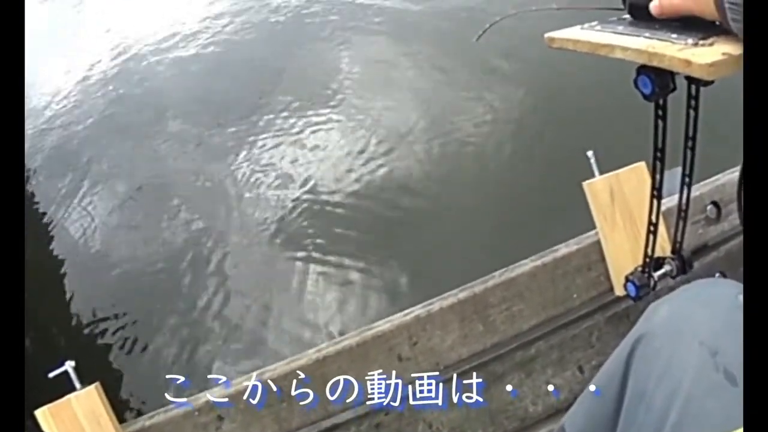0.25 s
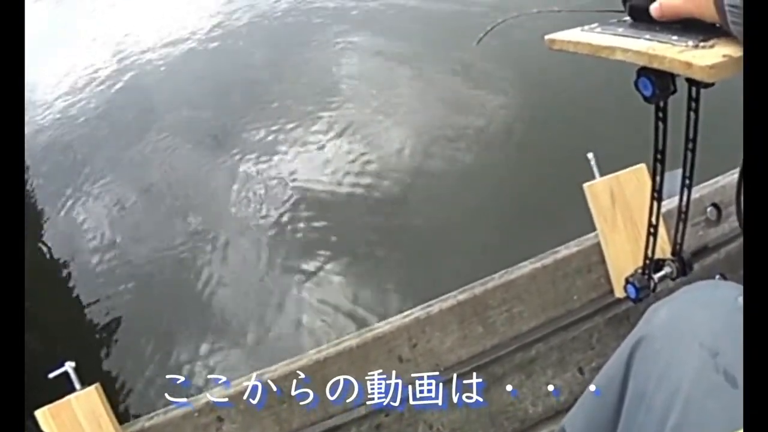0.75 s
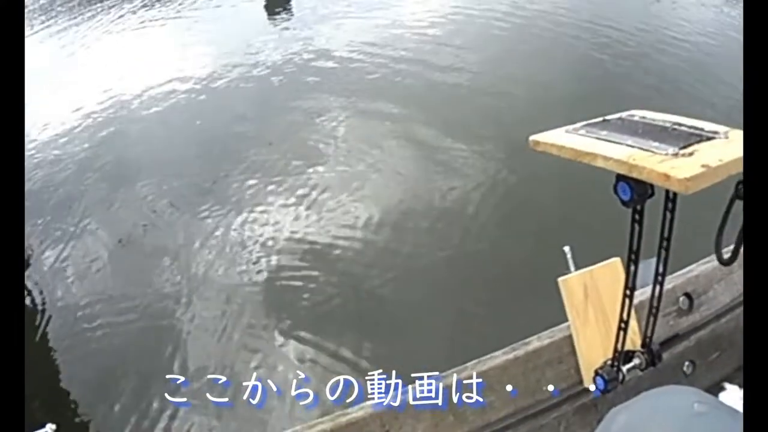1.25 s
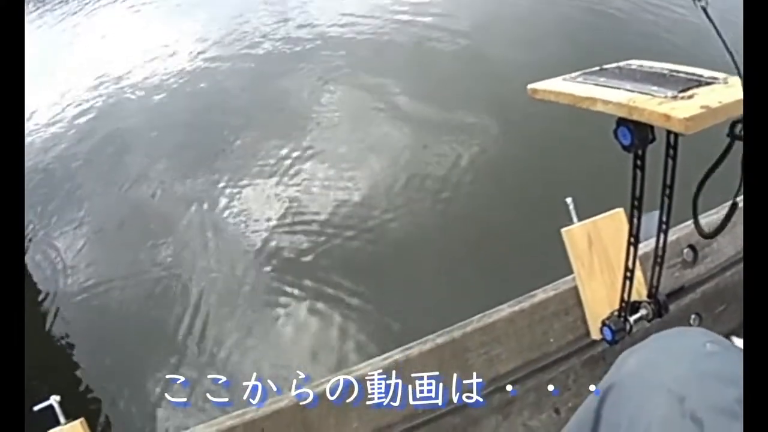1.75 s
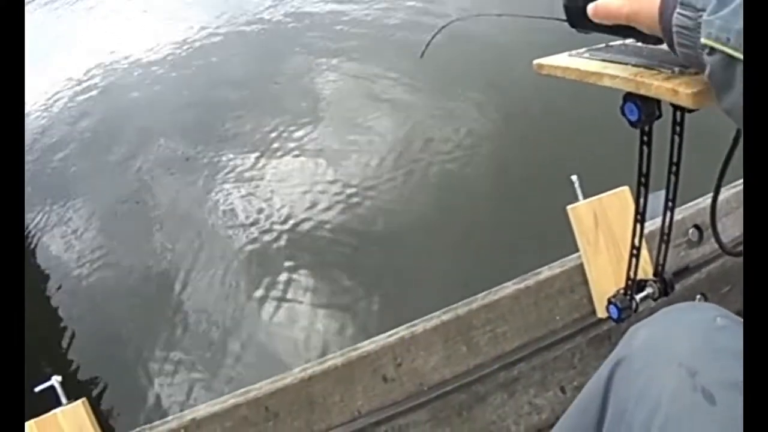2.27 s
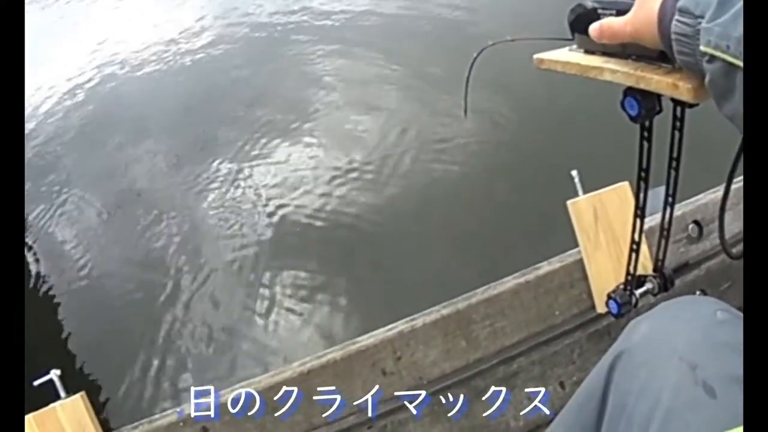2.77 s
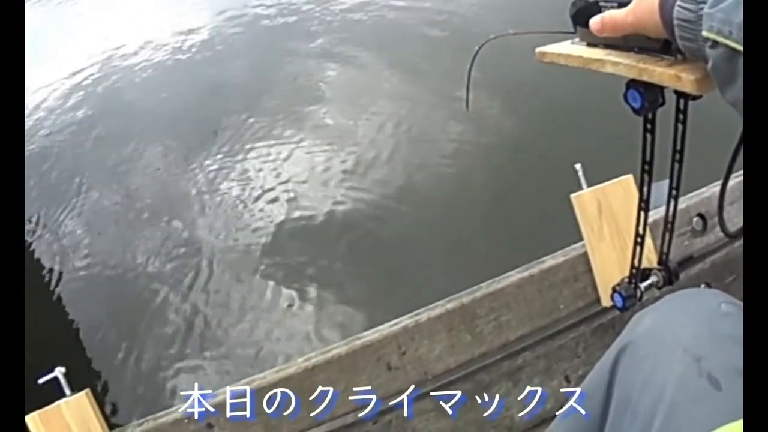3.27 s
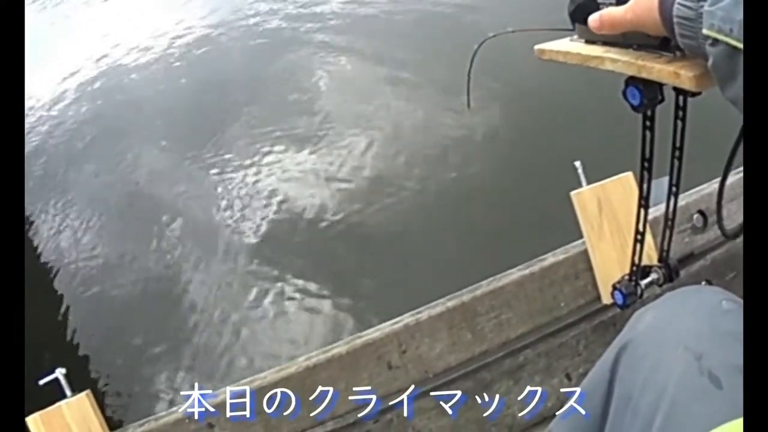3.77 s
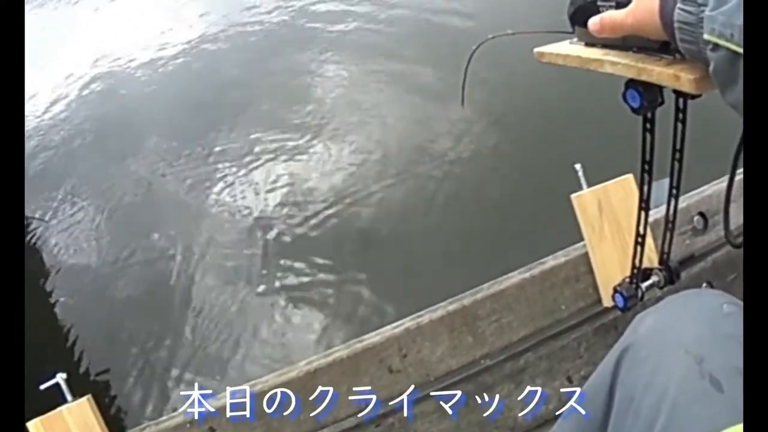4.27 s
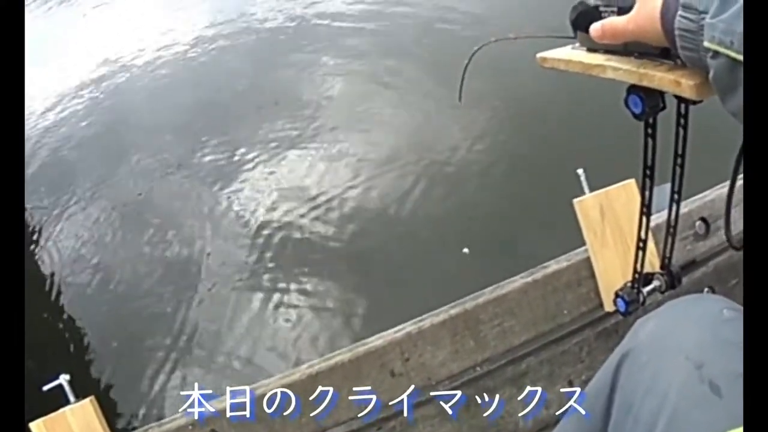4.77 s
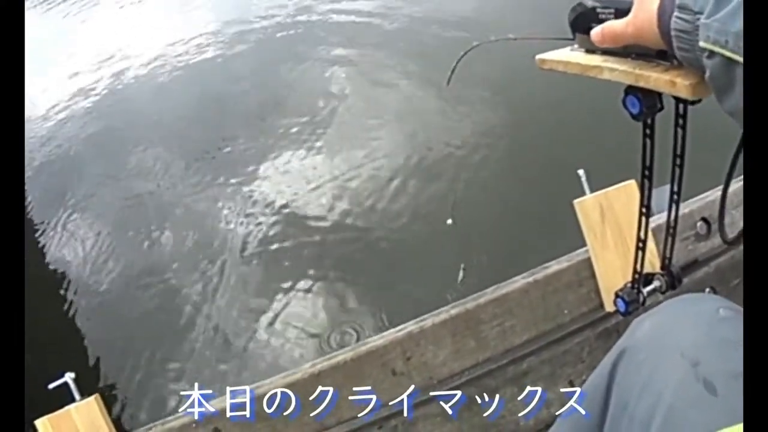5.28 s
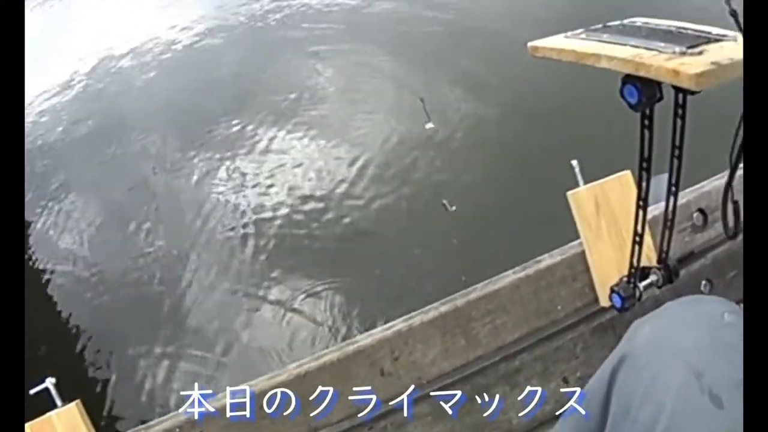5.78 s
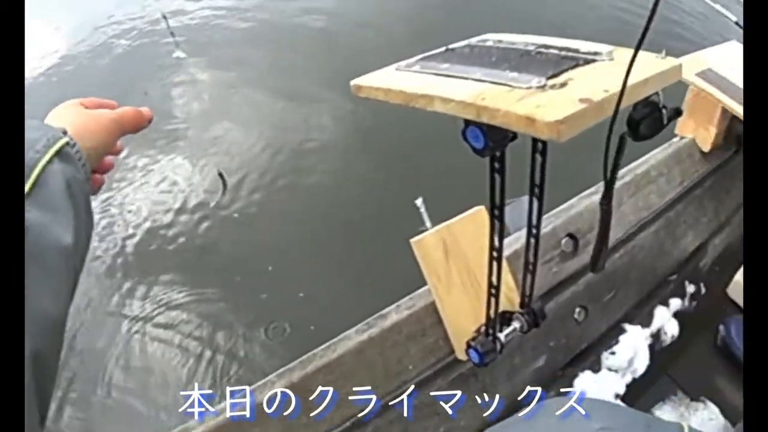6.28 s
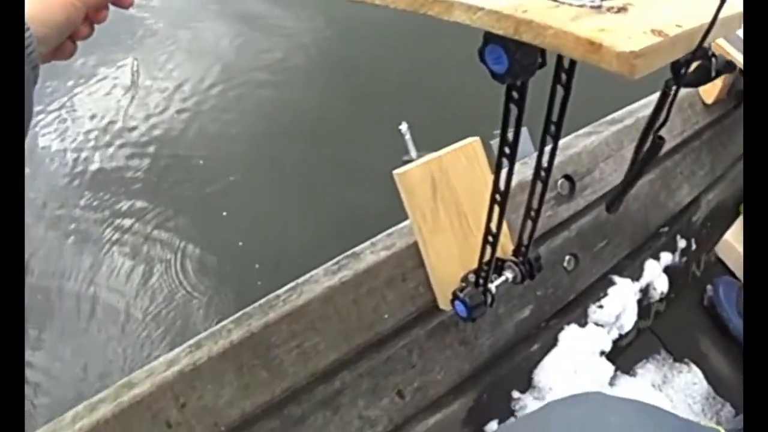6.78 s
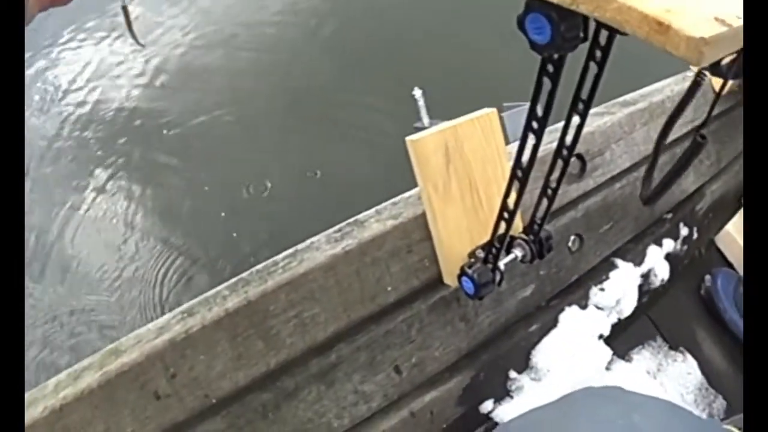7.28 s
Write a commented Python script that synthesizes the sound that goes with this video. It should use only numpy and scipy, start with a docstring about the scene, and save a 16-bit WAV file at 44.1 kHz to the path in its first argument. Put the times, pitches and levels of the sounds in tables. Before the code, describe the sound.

Quick bouts of light ticking from a small reel, then its motor whines and hisses before clothing rustles and hard knocks thump close by.

```python
"""Palm-sized electric fishing reel: jigged, it ticks; its motor then whines and hisses, winding in line.
Ticks and clicks are struck resonances; gear noise rings the reel's modes and shaft harmonics whine.
A scuff, line rasps and a drag are grainy noise. A nylon sleeve rustles and knocks on a worn camera's case
(noise swells, struck modes). Behind: noise for still air and ripples at a small boat; wavering sines
for bubble plips, low hull slaps and the hollow note of a knock."""
import sys
import numpy as np
from scipy import signal
from scipy.fft import rfft, irfft
from scipy.io import wavfile
from scipy.ndimage import uniform_filter1d

SR = 44100
rng = np.random.default_rng(int(sys.argv[2]) if len(sys.argv) > 2 else 0)


def generate_wav(signal):
    """Clip the signal to [-1, 1] and save it as 16-bit WAV at the path in sys.argv[1]."""
    frames = np.transpose(np.atleast_2d(signal))
    scaled = np.clip(frames, -1, 1) * 32767
    pcm = np.round(scaled).astype(np.int16)
    wavfile.write(sys.argv[1], SR, pcm)


N = 332514
TIME_S, BIN_HZ = np.arange(N) / SR, np.fft.rfftfreq(N, 1 / SR)
STRIKE_SAMPLES = 4096
STRIKE_HZ = np.fft.rfftfreq(STRIKE_SAMPLES, 1 / SR)
EDGE_HZ = 11150

# left-right likeness: (frequency [Hz], likeness [0-1])
CASE_LIKENESS = [(30, 0.98), (150, 1), (500, 0.88), (1300, .95), (2100, .93), (2900, 0.73), (3900, 0.77),
                 (6000, 0.8), (10000, 0.5)]  # carried by the case
AIR_LIKENESS = [(30, 0.92), (90, 1), (220, 0.62), (550, 0.027), (1300, 0.46), (2000, 0.58), (2900, 0.15),
                (3900, 0.69), (6000, 0.89), (10000, 0.57)]  # from the open air

# still air: (frequency [Hz], level [dB])
AIR_COLOUR = [(13, -45), (22, 0), (53, -13.5), (119, -7.5), (206, -9), (289, -10.5), (320, -8.5),
              (355, -12), (438, -8.5), (817, -13.5), (1010, -12.5), (1370, -11), (1690, -14), (4310, -16.5),
              (11000, -36), (14300, -81), (22000, -120)]
AIR_DB = -60.5
# ripples along the hull, before drift and a 2.5 dB cut: (time [s], level [dB])
RIPPLE_LEVELS = [(0, -74), (.3, -72), (.7, -80), (1.3, -64.5), (1.8, -55.5), (2.4, -59), (4.8, -59),
                 (5.15, -62.5), (7.54, -64)]
# bubble plips, low hull slaps and the hollow note of a knock:
# (start [s], peak [dB], starting pitch [Hz], a quarter of the duration [s])
SHORT_NOTES = [(0.002, -53.5, 1310, 0.044), (0.123, -48, 1274, 0.018), (0.557, -58, 1880, .025),
               (1.007, -43, 128, 0.013), (1.196, -36, 760, 0.017), (1.380, -48.5, 164, 0.029),
               (1.484, -46, 196, 0.023), (1.9, -44, 205, 0.011), (2.765, -45, 1318, 0.026),
               (3.47, -49, 1560, 0.022), (3.689, -55.5, 413, 0.016), (4.015, -50, 1288, 0.046),
               (4.523, -53, 1330, 0.026), (4.929, -57.5, 788, 0.052), (6.880, -39, 135, 0.028)]

# modes of the camera case: (frequency [Hz], width [Hz], level [dB])
CASE_MODES = [(183, 130, -10.5), (814, 98, -1.5), (1335, 164, 1.5), (1827, 214, -2.5), (2340, 200, -10),
              (3570, 390, -16.5)]
# hollow case mode that heavy knocks wake: (frequency [Hz], width [Hz])
THUD_MODE = (356, 35)
# knocks on the case: (start [s], level [dB], brightness [dB/octave], thud mode [dB])
CASE_KNOCKS = [(0.6414, -30.5, 20, -30), (1.004, -27, -10.5, -7), (1.011, -27, 11, -14),
               (1.073, -31.5, -10, -5), (1.2004, -29.5, -5, -21), (5.379, -45, -1, -37),
               (5.9412, -22, -2, -25), (5.9519, -5.5, 5, -8), (6.0157, -9.5, 5, -4.5),
               (6.279, -20, 10, -25), (6.9980, -6.5, 2.5, -31), (7.1363, -30, -11.5, -29.5),
               (7.1579, -15.5, -4.5, -2.5), (7.304, -29.5, 18, -27)]
# cloth spectra: (frequency [Hz], level [dB])
RUB_SPECTRUM = [(40, -44), (130, -11), (250, -15.5), (380, -10.5), (560, -18.5), (780, -4.5), (1000, -7.5),
                (1320, 0.5), (1600, -17), (1900, -6.5), (2450, -15.5), (3100, -18.5), (4000, -20),
                (6000, -42)]
SWISH_SPECTRUM = [(880, -49), (1500, 0.5), (1980, -8), (2160, -16.5), (2450, -3.5), (3370, -4), (4150, -11),
                  (4660, -5.5), (8220, -22), (11000, -45.5), (14300, -78), (22000, -120)]
FOLD_SPECTRUM = [(22, -5), (60, -13.5), (120, 0), (200, -5.5), (330, -11.5), (600, -12.5), (1200, -12.5),
                 (2400, -48)]
SCRAPE_SPECTRUM = [(700, -15), (1200, -13), (1550, 4.5), (2000, 1.5), (2170, 3), (2480, 0), (2850, -2.5),
                   (3300, -18), (3700, -5.5), (4700, -13), (6000, -57)]
# arm movements:
# (peak [s], rise [s], fall [s], rubbing [dB], nylon swish [dB], heavy folds [dB], hard scraping [dB])
MOVES = [(0.12, 0.29, 0.37, -69.5, -62.5, -71.5, -79), (1.04, 0.23, .29, -46.5, -55.5, -49, -59),
         (1.54, 0.29, 0.38, -57, -61.5, -57.5, -60), (5.72, 0.23, 0.75, -55.5, -61.5, -62, -75),
         (6.149, 0.24, 0.16, -40, -38.5, -47.5, -39), (6.249, 0.2, 0.26, -37, -44, -47, -35),
         (6.65, 0.65, 0.66, -42, -48.5, -52.5, -58), (6.889, 0.12, 0.11, -41.5, -68, -46, -70),
         (7.255, .17, 0.16, -42, -53.5, -55, -47), (7.52, 0.2, .2, -48.5, -58, -54.5, -57.5)]
SCRAPE_SHARE = 0.7  # of a movement's rise and fall
# drop one rise before and one fall after the peak; shape 1 = pointed, 2 = round
SWELL_DROP_DB, SWELL_SHAPE = 20.5, 1.85

# rasp and drag spectra: (frequency [Hz], level [dB])
RASP_SPECTRUM = [(530, -62), (900, -31), (1310, -12.5), (1820, -10), (2080, -23), (2570, -7), (3030, -12),
                 (3820, -4), (8120, -22.5), (11000, -38), (14300, -67), (22000, -120)]
DRAG_SPECTRUM = [(2000, -43), (2550, -10), (2880, 0), (3500, -8.5), (4000, 0), (4700, -9.5), (5700, -16),
                 (6700, -15), (7150, -10.5), (8200, -29), (11000, -45)]
# short rasps, an early scuff, then line jerking over the spool: (peak [s], rise [s], fall [s], level [dB])
SHORT_RASPS = [(0.126, 0.01, 0.016, -48.5), (3.153, 0.0068, .014, -54), (3.196, 0.061, .032, -41.5)]
DRAG_FROM_S, DRAG_TO_S, DRAG_RAMP_S, DRAG_DB = 4.16, 4.6, 0.098, -51

# motor speed, giving with the pull on the line: (time [s], shaft speed [turns/s])
SHAFT_SPEED = [(1.9, 102), (2.3, 106.5), (2.58, 107.7), (2.72, 111.7), (2.87, 111.9), (3.08, 113.5),
               (3.21, 111.2), (3.3, 111.7), (3.41, 108.8), (3.58, 108.4), (3.67, 111), (3.77, 111.1),
               (3.93, 104.9), (4.5, 106), (4.9, 105)]
# whine harmonics: (multiple of shaft speed, level [dB])
WHINE_HARMONICS = [(26, -12), (27, -1), (51, -10), (54, -11), (63, -12)]
# reel modes rung by the gears: (frequency [Hz], width [Hz], level [dB])
GEAR_MODES = [(2920, 180, 1), (3463, 113, 3), (3830, 51, -4), (4700, 200, -6), (5040, 260, -5),
              (5900, 300, -5), (6660, 310, -5.5), (7200, 540, -9.5)]
# narrow spool modes, sung as shaft harmonics pass: (frequency [Hz], width [Hz], level [dB])
SPOOL_MODES = [(3505, 45, -73), (3660, 14, -67.5), (3920, 46, -66)]
POLES = 3
MOTOR_ON_S, MOTOR_OFF_S, FADE_IN_S, FADE_OUT_S = 1.83, 4.91, 0.27, 0.071
WHINE_DB, LOADED_GAIN_DB = -78, 15  # gain added while the rod is bent hardest
LOAD_FROM_S, LOAD_TO_S, LOAD_RAMP_S = 2.56, 3.96, 0.09
HISS_PEAK_DB, HISS_PEAK_S, HISS_EASE_DB_PER_S2 = -57, 3.18, -2
TAUT_FROM_S = 2.22  # line taut: the spool can sing

# clicks of the reel's plastic shell, before a common 2 dB gain:
# (start [s], level [dB], brightness [dB/octave], place [0 = switch, 1 = frame], left-right [dB])
SHELL_CLICKS = [(2.4990, -14.5, 2.5, 0, -0.5), (4.0990, -36.5, -13, 1, -1), (4.1504, -17, 0, 1, 2),
                (4.845, -44.5, -6, 0.24, 0), (5.273, -34.5, -10.5, 0.24, 0)]
# shell modes: (frequency [Hz], width [Hz], struck at switch [dB], struck at frame [dB])
SHELL_MODES = [(230, 210, -17.5, -55), (1317, 68, -1.5, -22), (1630, 56, -16, -9), (1790, 140, -6, -32),
               (2953, 76, -2, 1.5), (3650, 180, 3.5, -24), (3790, 110, -23, 5), (3970, 240, -22, -3),
               (4330, 340, -8, -10), (4460, 140, -3, -8), (5070, 170, -3, -0.5), (5270, 280, -11.5, -28),
               (5600, 100, -18, -6), (6870, 140, -18.5, -21), (7500, 210, -15, -16.5)]
# single ticks outside the bouts, the first a lone jig stroke, sounded 0.8 ms late: (time [s], level [dB],
# brightness [dB/octave])
SINGLE_TICKS = [(0.0227, -34.5, 4), (1.5822, -32, -5), (1.8945, -38.5, 3), (1.948, -38.5, -11)]
# (frequency [Hz], width [Hz], level [dB])
REEL_TICK_MODES = [(3040, 230, -7.5), (3650, 270, -8), (3980, 420, -3.5), (4760, 170, -9.5),
                   (6140, 200, -10.5), (7750, 350, -45)]
# jigging bouts: (first tick [s], last stroke tick [s], level [dB], first-stroke offset [dB])
JIG_BOUTS = [(0.0984, 0.2515, -40.5, 2), (0.327, 0.6274, -27.5, -3), (0.7847, 1.238, -28.5, -8),
             (1.3226, 1.4716, -27, -4.5)]
STROKE_S, TIRING_DB_PER_S2 = 0.075, -66
RETURN_S, RETURN_DB = 0.04, -12  # softer tick as the reel swings back
STROKE_DB_PER_OCT, RETURN_DB_PER_OCT, SPREAD_DB_PER_OCT = 0.4, -8, 0.81


def amp(db):
    """Decibels to gain."""
    return 10 ** (np.asarray(db) / 20)


def unit(x):
    """Scaled to rms 1."""
    return x / np.sqrt(np.mean(x ** 2) + 1e-20)


def read(points, hz=BIN_HZ):
    """A table interpolated along log frequency."""
    f, value = np.transpose(points)
    return np.interp(np.log(hz + 1), np.log(f + 1), value)


def level(s, db):
    """Gain along a dB curve, -140 dB outside it."""
    return amp(np.interp(TIME_S, s, db, left=-140, right=-140))


def add(mix, s, sound):
    """Mixes a stereo sound in at time s."""
    part = mix[:, max(round(s * SR), 0):][:, :sound.shape[1]]
    part += sound[:, :part.shape[1]]


def resonances(modes, hz):
    """Gain of a body: mode powers added."""
    power = 0
    for f, width, db in modes:
        detune = (hz ** 2 - f ** 2) / (width * hz + 1)
        power = power + amp(db) ** 2 / (1 + detune ** 2)
    return np.sqrt(power)


def below(hz, edge_hz, order):
    """Low-pass gain; a negative order makes it a high-pass."""
    return 1 / np.sqrt(1 + ((hz + 1) / edge_hz) ** (2 * order))


def wander(rate_hz):
    """Low-passed random drift of rms 1."""
    noise = rfft(rng.standard_normal(N))
    return unit(irfft(noise * below(BIN_HZ, rate_hz, order=3), N))


def coloured(pair, gain, likeness):
    """Mid and side drives become one coloured stereo sound of rms 1."""
    a, b = rfft(pair)
    same = np.clip(read(likeness), 0, 1)
    mid, side = a * np.sqrt(1 + same), b * np.sqrt(1 - same)
    return unit(irfft(np.array([mid + side, mid - side]) * gain, N))


def friction(gain, likeness, grains_per_s, spread_db, grainy):
    """Tiny slips of uneven size over a smooth hiss."""
    sizes = amp(spread_db * np.minimum(rng.exponential(1, N), 3))
    slips = (rng.random(N) < grains_per_s / SR) * sizes
    grains = unit(slips * rng.choice([-1, 1], (2, N)))
    return coloured(rng.standard_normal((2, N)) + grainy * grains, gain, likeness)


def strike(gain, ring_peak_db, echo_s, echo, scatter, scatter_s, width):
    """A blow rings a body; one near reflection and a short scatter follow."""
    # minimum phase: the ring starts at once
    log_gain = np.log(np.maximum(gain / gain.max(), 1e-5))
    mirrored = np.r_[log_gain, log_gain[-2:0:-1]]
    ring = np.fft.ifft(np.exp(np.conj(signal.hilbert(mirrored)))).real
    t = np.arange(STRIKE_SAMPLES) / SR
    decay = np.exp(-t / scatter_s) + 0.018 * np.exp(-t / 0.015)
    mid, side = rng.standard_normal((2, STRIKE_SAMPLES)) * decay
    paths = (scatter * mid + width * np.array([side, -side])) / np.linalg.norm(mid)
    paths[:, 0] += 1  # direct sound
    reflection = echo * np.exp(-2j * np.pi * STRIKE_HZ * echo_s)
    sound = irfft(rfft(ring) * (rfft(paths) + reflection), STRIKE_SAMPLES)
    return amp(ring_peak_db) * sound / abs(ring).max()


def tilt(db_per_octave, centre_hz):
    """Brightness slope about a centre, flat beyond two octaves."""
    return amp(db_per_octave * np.log2(np.clip(STRIKE_HZ / centre_hz, 1 / 4, 4)))


def swell(peak_s, rise_s, fall_s, db):
    """Gain of a movement that gathers speed and slows again."""
    away = np.maximum((peak_s - TIME_S) / rise_s, (TIME_S - peak_s) / fall_s)
    return amp(db - SWELL_DROP_DB * np.minimum(away, 10) ** SWELL_SHAPE)


def held(from_s, to_s, attack_s, release_s):
    """Attack, hold and release, 0-1."""
    return np.clip(np.minimum((TIME_S - from_s) / attack_s, (to_s - TIME_S) / release_s), 0, 1)


def still_air():
    """Steady coloured noise with slight level drift."""
    noise = coloured(rng.standard_normal((2, N)), amp(read(AIR_COLOUR)), AIR_LIKENESS)
    return noise * amp(AIR_DB + 0.77 * wander(18))


def ripples():
    """Ripples along the hull, heard through the case's modes."""
    case = resonances(CASE_MODES, BIN_HZ) * below(BIN_HZ, 810, order=-1) * below(BIN_HZ, 2160, order=6)
    lapping = friction(case, AIR_LIKENESS, grains_per_s=200, spread_db=3.0, grainy=0.52)
    return lapping * level(*np.transpose(RIPPLE_LEVELS)) * amp(-2.5 + 2.16 * wander(47))


def short_notes():
    """Bubble plips, low hull slaps and the hollow note of a knock, each wavering and rising a little."""
    out = np.zeros((2, N))
    for s, peak_db, start_hz, length_s in SHORT_NOTES:
        u = np.arange(int(4 * length_s * SR)) / (length_s * SR)
        envelope = (4 * u) * np.exp(1 - 4 * u)
        waver = uniform_filter1d(rng.standard_normal(len(u)), size=100)
        pitch_hz = start_hz * (1 + 0.037 * u + 0.37 * waver)
        note = np.sin(2 * np.pi * np.cumsum(pitch_hz) / SR)
        add(out, s, amp(peak_db) * np.array([envelope * note] * 2))
    return out


def clothes():
    """Cloth rubs and scrapes on the case, nylon swishes and heavy folds shift."""
    case = resonances(CASE_MODES, BIN_HZ) ** 0.26  # modes only faintly felt
    rub = friction(amp(read(RUB_SPECTRUM)) * case, CASE_LIKENESS,
                   grains_per_s=600, spread_db=3, grainy=0.72) * amp(0.92 * wander(38))
    swish = friction(amp(read(SWISH_SPECTRUM)), CASE_LIKENESS,
                     grains_per_s=1100, spread_db=2.5, grainy=0.77) * amp(1.2 * wander(60))
    folds = friction(amp(read(FOLD_SPECTRUM)), CASE_LIKENESS,
                     grains_per_s=200, spread_db=3, grainy=0.41) * amp(3.4 * wander(32))
    scrape = friction(amp(read(SCRAPE_SPECTRUM)), CASE_LIKENESS,
                      grains_per_s=760, spread_db=1.5, grainy=1.34) * amp(2.1 * wander(80))
    power = np.zeros((4, N))
    for s, rise, fall, rub_db, swish_db, folds_db, scrape_db in MOVES:
        cloth = [swell(s, rise, fall, db) for db in (rub_db, folds_db, swish_db)]
        scraped = swell(s, SCRAPE_SHARE * rise, SCRAPE_SHARE * fall, scrape_db)
        power += np.square([*cloth, scraped])
    rubbing, folding, swishing, scraping = np.sqrt(power)
    swish = swish * amp([[0.8], [-0.8]])  # slightly left
    return rub * rubbing + folds * folding + swish * swishing + scrape * scraping


def knocks():
    """Dull, dry blows ring the camera case."""
    out = np.zeros((2, N))
    muffle = below(STRIKE_HZ, 3340, order=18) + 0.018 * below(STRIKE_HZ, 5550, order=4)
    for s, db, bright, thud_db in CASE_KNOCKS:
        case = resonances([*CASE_MODES, (*THUD_MODE, thud_db)], STRIKE_HZ) * muffle
        sound = strike(case * tilt(bright, 1970), db, echo_s=0.002184, echo=0.091,
                       scatter=0.61, scatter_s=0.0021, width=0.22)
        add(out, s, sound)
    return out


def rasps_and_drag():
    """Short rasps: an early scuff, then line jerking over the spool; later a longer drag of line."""
    rasp = friction(amp(read(RASP_SPECTRUM)), AIR_LIKENESS, grains_per_s=1100, spread_db=3.5, grainy=2.8)
    drag = friction(amp(read(DRAG_SPECTRUM)), AIR_LIKENESS, grains_per_s=710, spread_db=3.0, grainy=0.61)
    rasping = sum(swell(*row) for row in SHORT_RASPS)
    dragging = amp(DRAG_DB) * held(DRAG_FROM_S, DRAG_TO_S, DRAG_RAMP_S, DRAG_RAMP_S)
    return rasp * rasping + drag * dragging


def gear_hiss(turn):
    """Gear noise throbs with the motor's poles in the reel's resonances."""
    throb = 1 + 0.42 * np.cos(POLES * turn)
    teeth = rng.standard_normal((2, N)) * throb * amp(2.0 * wander(150))
    # uneven teeth: a comb of faint shaft harmonics, alike left and right
    comb = unit(sum(np.cos(k * turn + 2 * np.pi * rng.random()) for k in range(28, 72)))
    teeth[0] += 0.29 * comb
    body = resonances(GEAR_MODES, BIN_HZ) * below(BIN_HZ, 2560, order=-8) * below(BIN_HZ, 7700, order=12)
    ease_db = HISS_EASE_DB_PER_S2 * (TIME_S - HISS_PEAK_S) ** 2
    return coloured(teeth, body, AIR_LIKENESS) * amp(HISS_PEAK_DB + ease_db)


def tooth_whine(turn):
    """Tooth meshing sounds shaft harmonics, louder under load."""
    load = held(LOAD_FROM_S, LOAD_TO_S, LOAD_RAMP_S, LOAD_RAMP_S)
    flutter = amp(1.5 * wander(14))
    tones = sum(amp(db) * unit(np.cos(k * turn)) for k, db in WHINE_HARMONICS)
    return tones * amp(WHINE_DB + LOADED_GAIN_DB * load) * flutter


def spool_singing(turn, speed):
    """Narrow spool modes sing as shaft harmonics pass through them."""
    tones = sum(resonances(SPOOL_MODES, k * speed) * unit(np.cos(k * turn)) for k in range(33, 37))
    return tones * held(TAUT_FROM_S, LOAD_TO_S, LOAD_RAMP_S, LOAD_RAMP_S)


def motor():
    """One slightly unsteady shaft drives hiss, whine and spool."""
    running = held(MOTOR_ON_S, MOTOR_OFF_S, FADE_IN_S, FADE_OUT_S)
    speed = np.interp(TIME_S, *np.transpose(SHAFT_SPEED))
    turn = 2 * np.pi * np.cumsum(speed * (1 + 0.0009 * wander(47.0))) / SR
    return running * (gear_hiss(turn) + tooth_whine(turn) + spool_singing(turn, speed))


def shell_clicks():
    """Plastic shell clicks; the place struck sets the mode balance."""
    out = np.zeros((2, N))
    for s, db, bright, place, pan_db in SHELL_CLICKS:
        modes = [(hz, width, switch_db + place * (frame_db - switch_db))
                 for hz, width, switch_db, frame_db in SHELL_MODES]
        shell = resonances(modes, STRIKE_HZ) * below(STRIKE_HZ, 8100, order=7)
        sound = strike(shell * tilt(bright, 5200), db + 2.0, echo_s=0.00143, echo=0.44,
                       scatter=0.43, scatter_s=0.0062, width=0.3)
        add(out, s, sound * amp([[pan_db / 2], [-pan_db / 2]]))
    return out


def jigging():
    """Even strokes, the first set apart in level, then tiring; each but the last has a return tick."""
    rows = []  # (time [s], level [dB], brightness [dB/octave])
    for first, last, bout_db, first_db in JIG_BOUTS:
        strokes = np.linspace(first, last, round((last - first) / STROKE_S) + 1)
        spreads = SPREAD_DB_PER_OCT * rng.standard_normal((len(strokes), 2))
        for s, spread in zip(strokes, spreads):
            db = bout_db + TIRING_DB_PER_S2 * (s - first) ** 2
            rows.append((s, db + first_db * (s == first), STROKE_DB_PER_OCT + spread[0]))
            if s < last:
                rows.append((s + RETURN_S, db + RETURN_DB, RETURN_DB_PER_OCT + spread[1]))
    return rows


def reel_ticks():
    """Light blows ring the reel as it is jigged and handled."""
    out = np.zeros((2, N))
    band = below(STRIKE_HZ, 2540, order=-7) * below(STRIKE_HZ, 6240, order=4)
    tick = resonances(REEL_TICK_MODES, STRIKE_HZ) * band
    for s, db, bright in jigging() + list(SINGLE_TICKS):
        sound = strike(tick * tilt(bright, 4000), db, echo_s=0.0019, echo=0.39,
                       scatter=0.67, scatter_s=0.0048, width=0.51)
        add(out, s + 0.0008, sound * amp([[0.8], [-0.8]]))
    return out


def scene():
    """Surroundings, angler and reel together."""
    surroundings = still_air() + ripples() + short_notes()
    angler = clothes() + knocks()
    reel = rasps_and_drag() + motor() + shell_clicks() + reel_ticks()
    return surroundings + angler + reel


def record(dry):
    """Band limit: linear-phase low-pass at EDGE_HZ."""
    lowpass = signal.firwin(401, EDGE_HZ, window=("kaiser", 8), fs=SR)
    return signal.oaconvolve(dry, lowpass[None], "same")


dry = scene()
out = record(dry)
generate_wav(out)
```